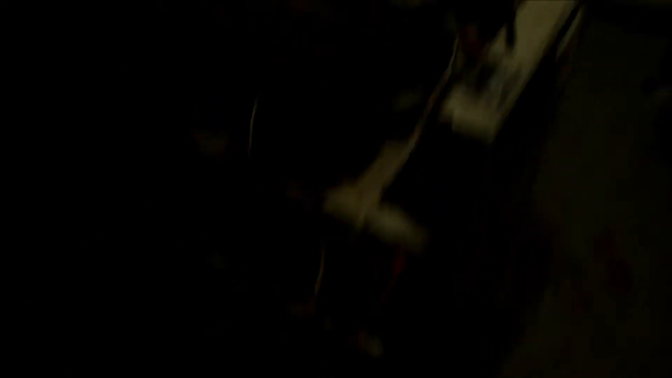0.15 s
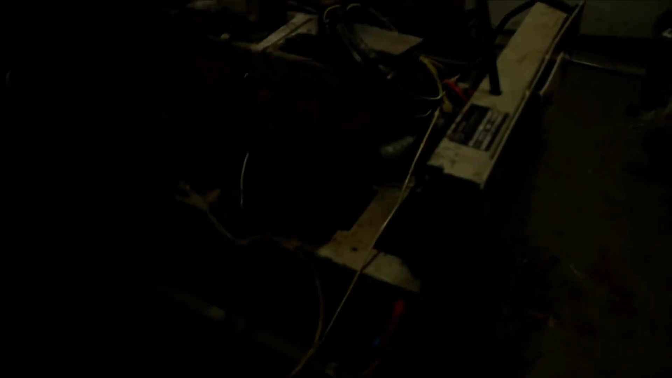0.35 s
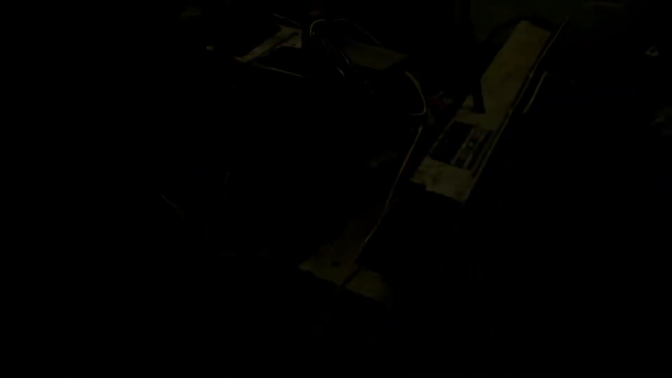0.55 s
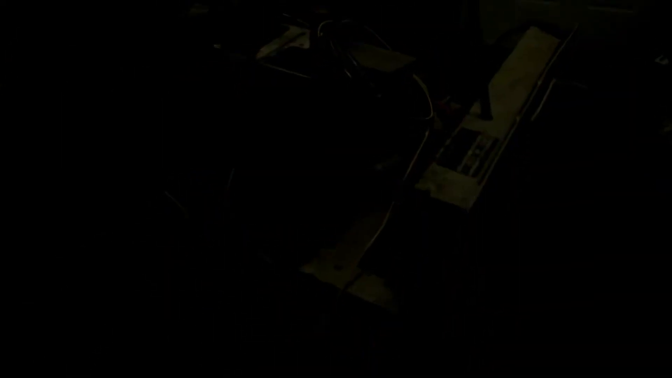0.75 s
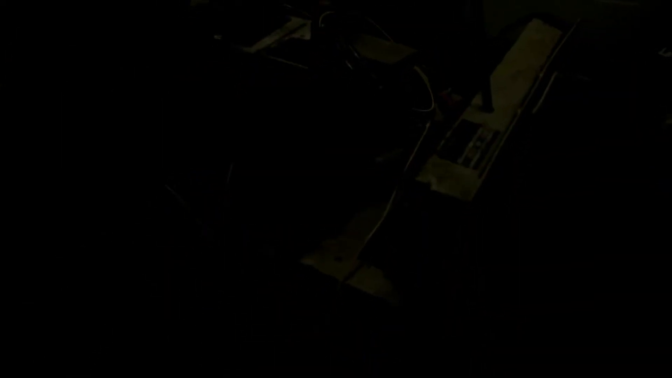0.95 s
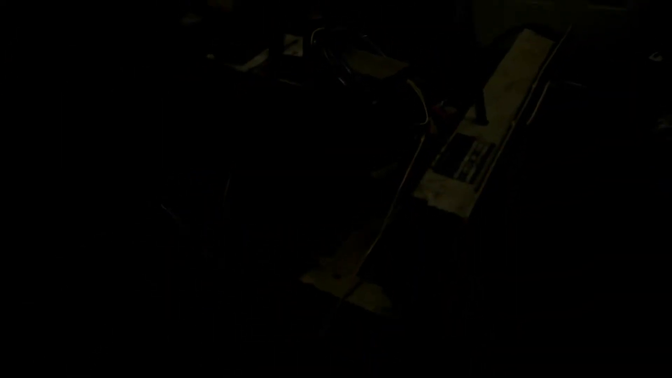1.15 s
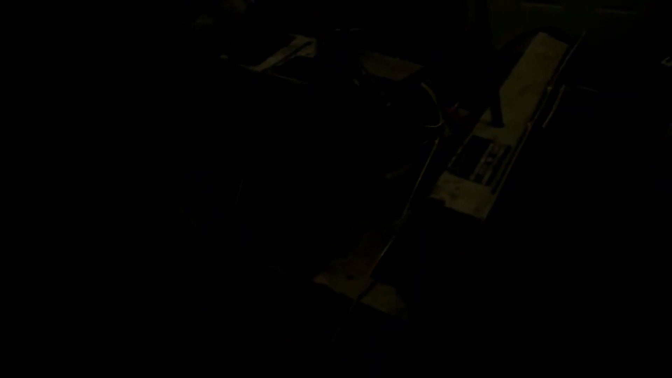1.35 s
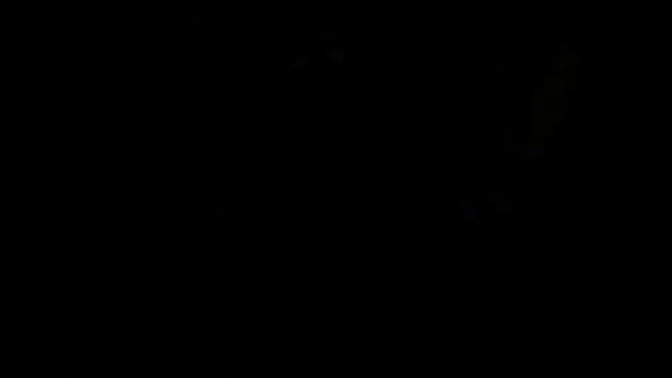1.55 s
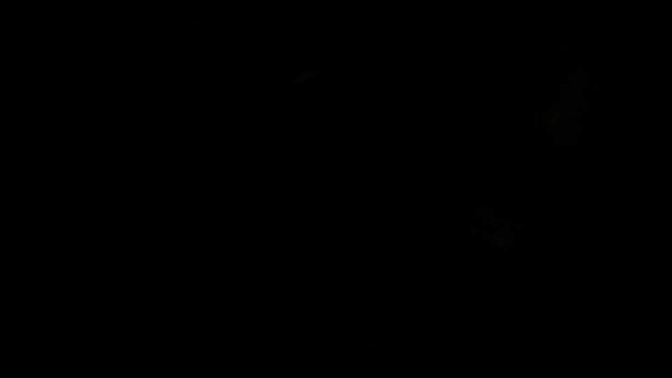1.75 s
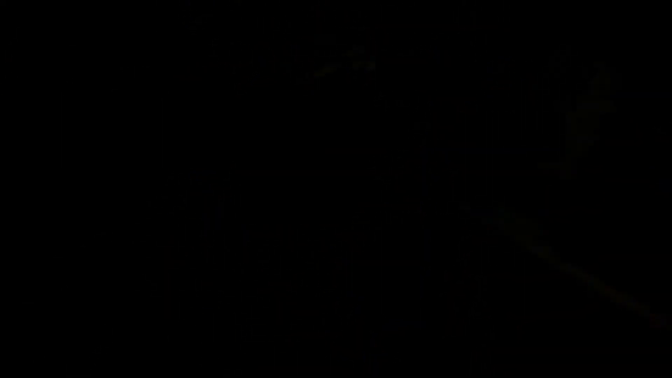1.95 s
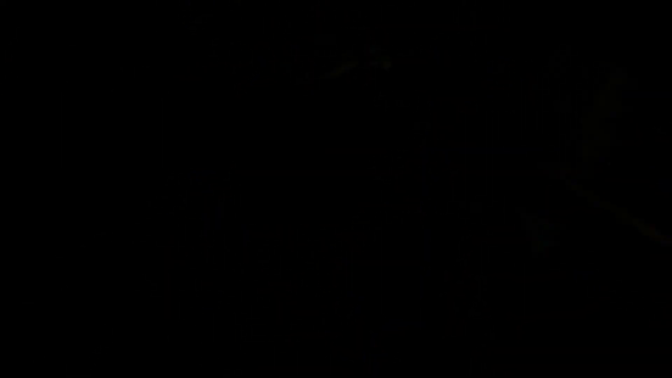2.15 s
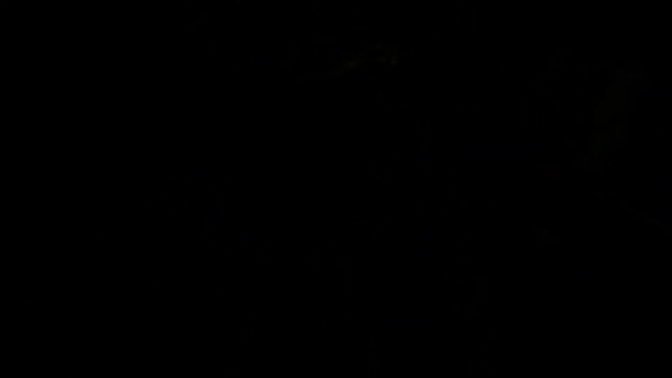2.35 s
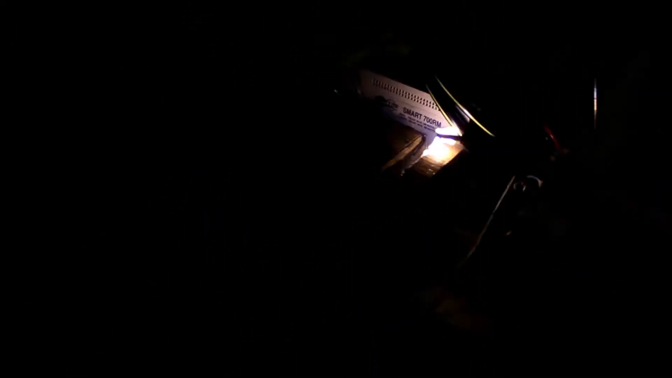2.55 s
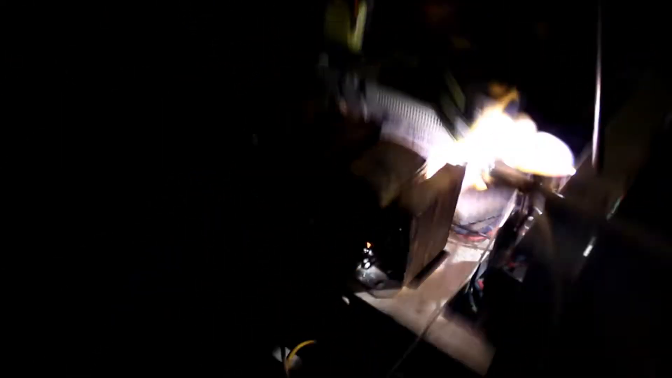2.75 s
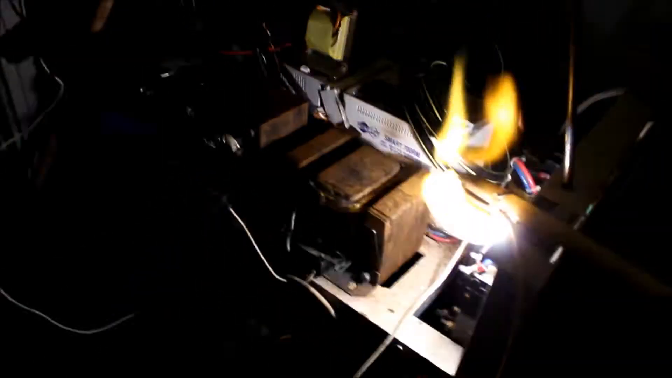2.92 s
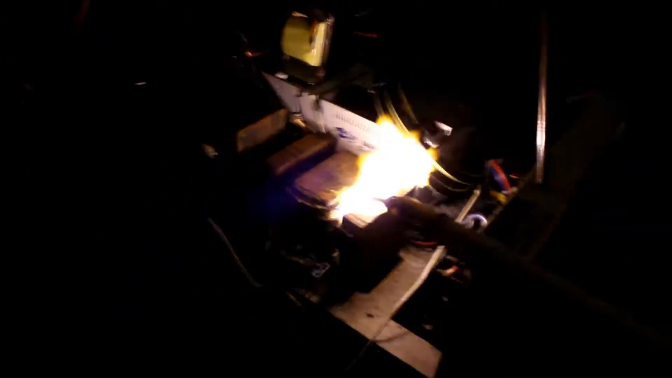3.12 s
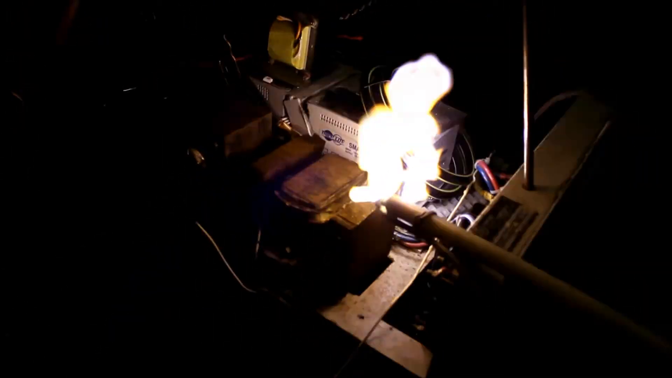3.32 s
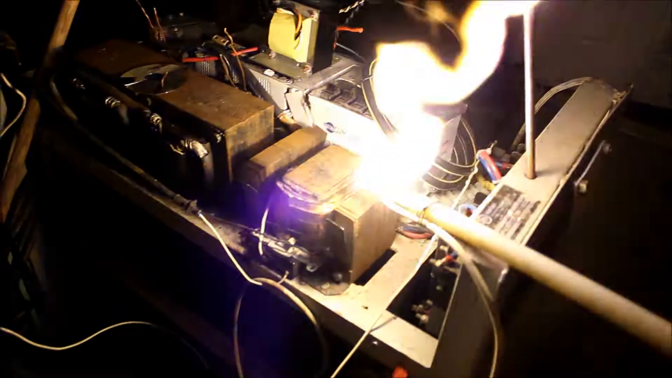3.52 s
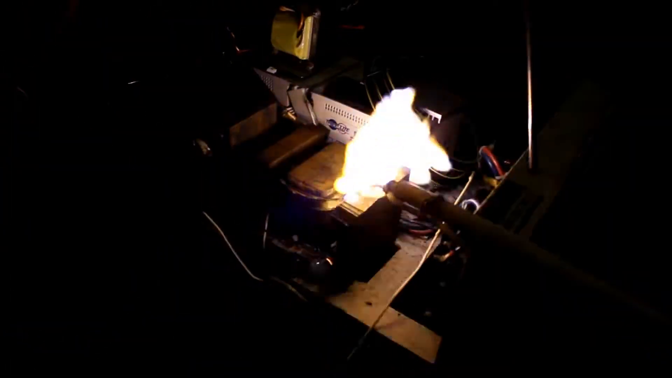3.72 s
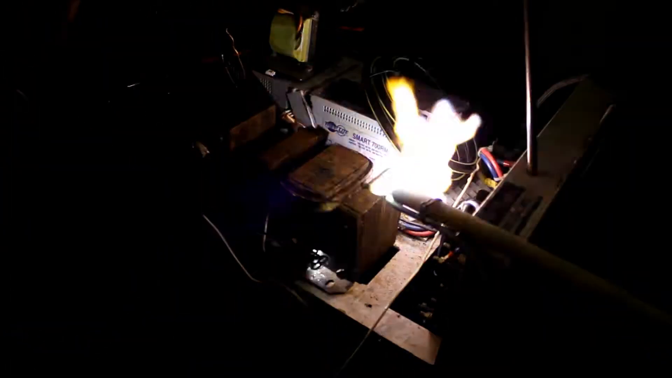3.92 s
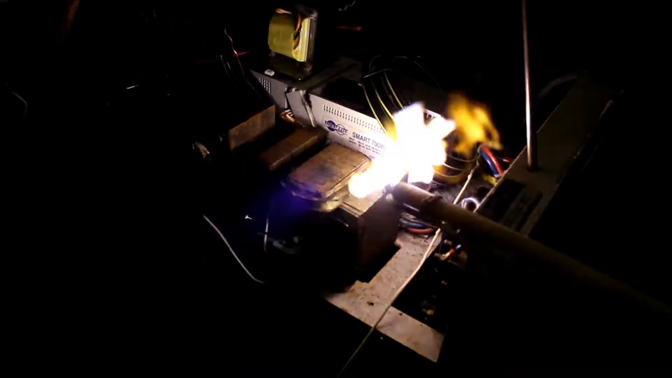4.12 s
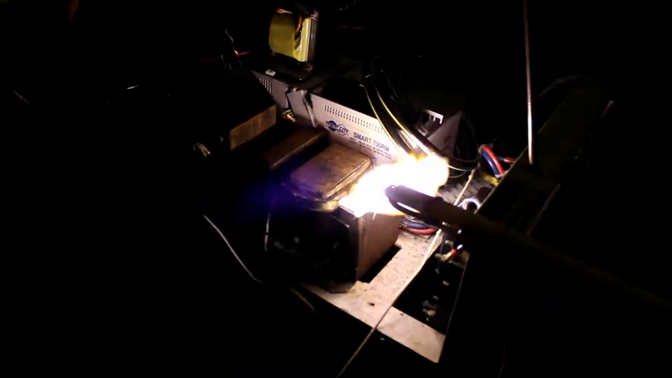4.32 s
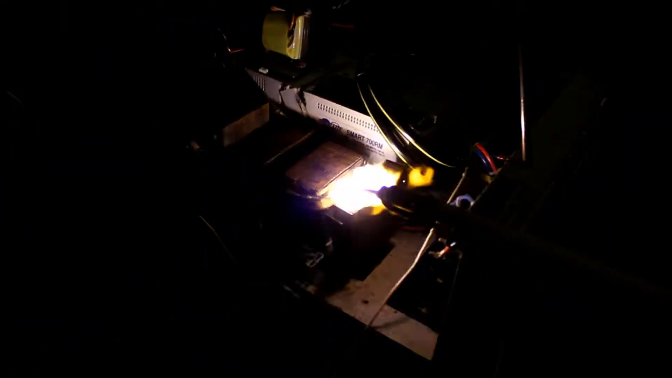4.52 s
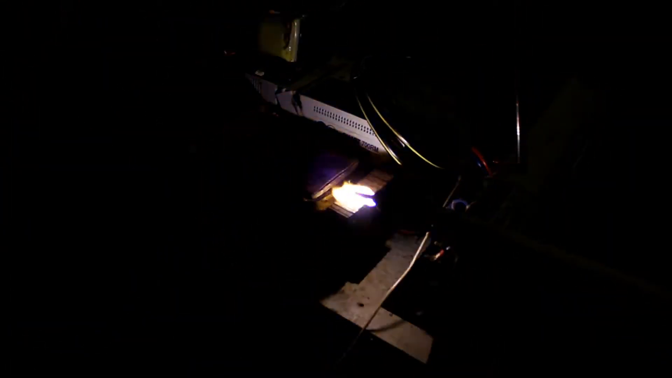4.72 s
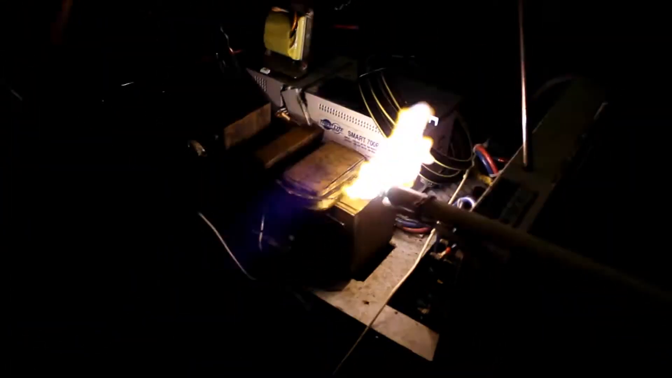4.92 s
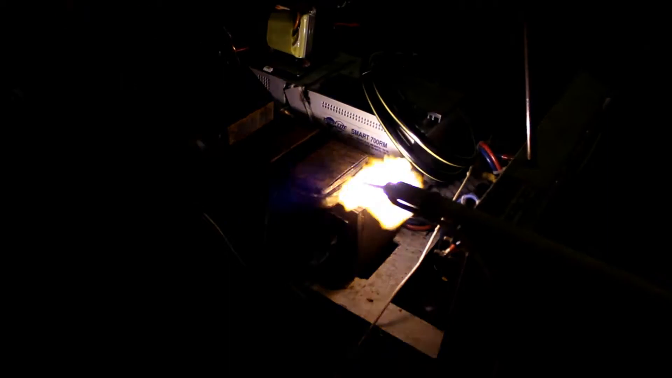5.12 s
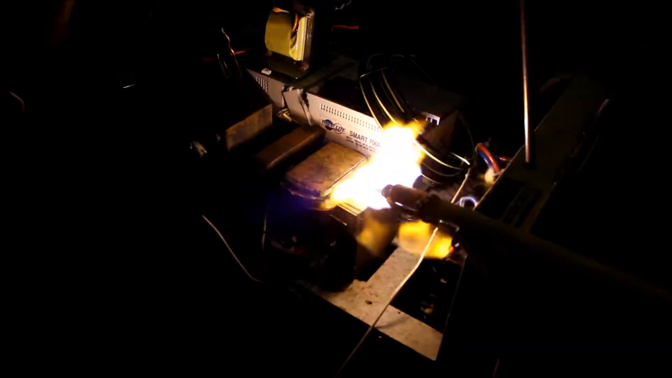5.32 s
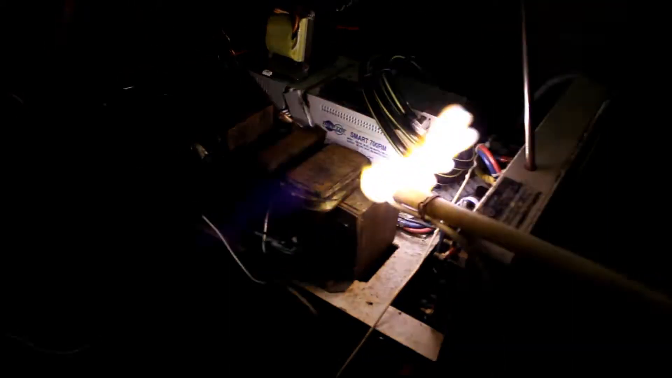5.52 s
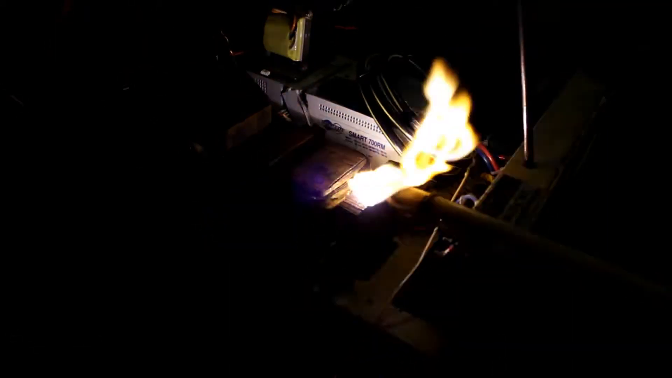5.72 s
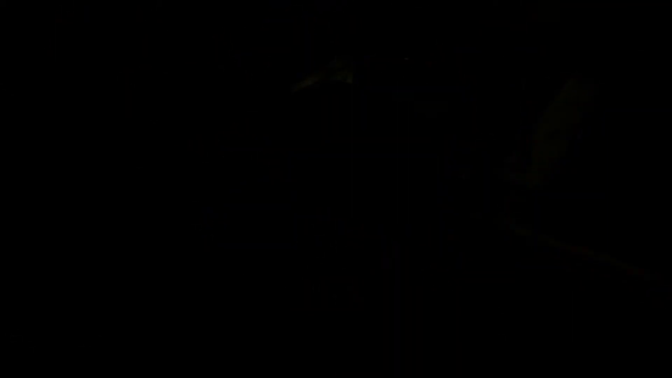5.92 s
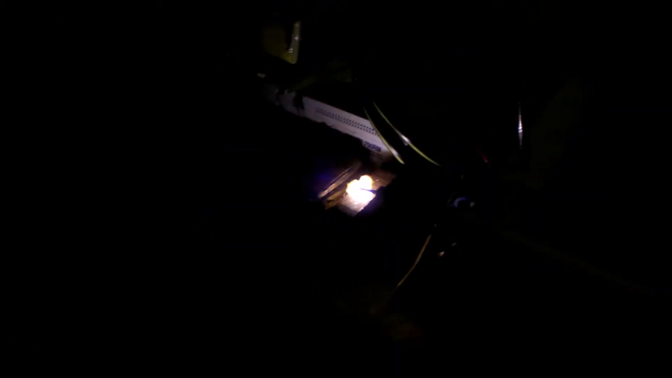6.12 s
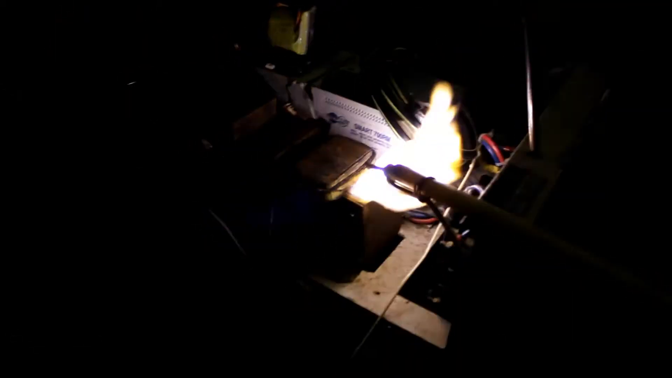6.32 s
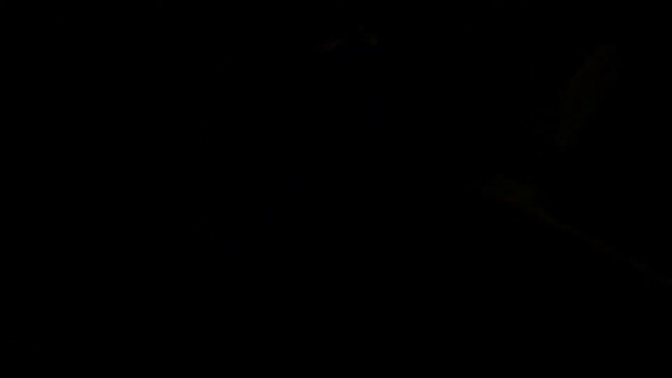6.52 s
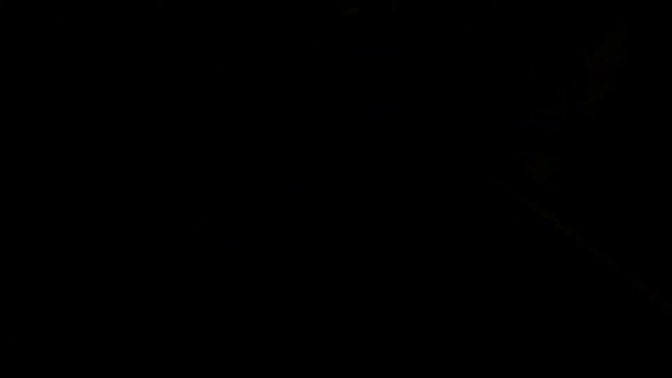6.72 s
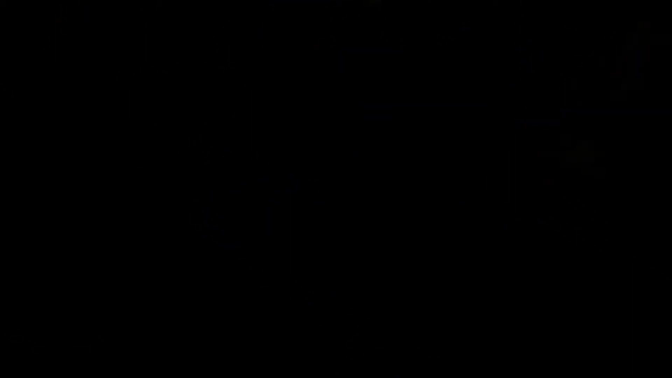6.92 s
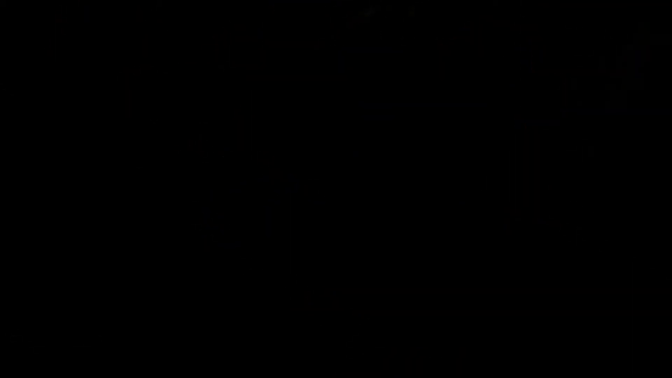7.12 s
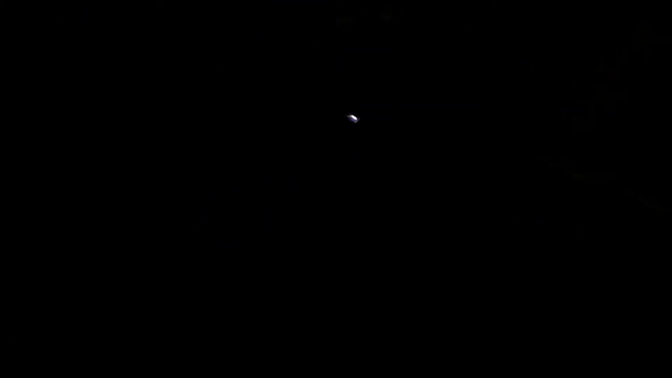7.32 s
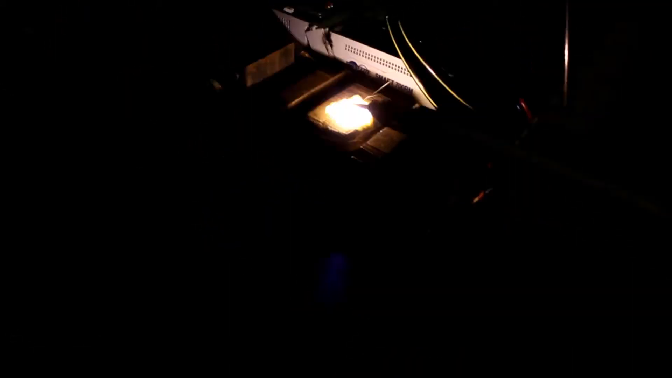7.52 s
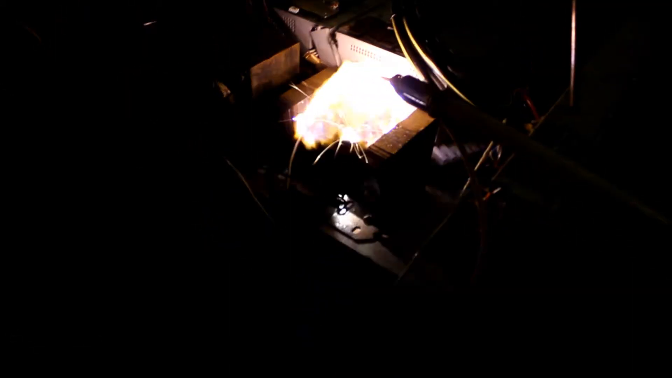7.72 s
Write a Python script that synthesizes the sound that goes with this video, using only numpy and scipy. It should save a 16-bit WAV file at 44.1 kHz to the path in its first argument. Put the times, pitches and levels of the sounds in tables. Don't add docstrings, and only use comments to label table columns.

```python
import sys
import numpy as np
from scipy import signal
from scipy.fft import rfft, irfft
from scipy.io import wavfile
from scipy.ndimage import uniform_filter1d

SR = 44100
rng = np.random.default_rng(int(sys.argv[2]) if len(sys.argv) > 2 else 0)


def wrap_up_sound(samples):
    columns = np.atleast_2d(samples).T
    tamed = np.clip(columns, -1, 1)
    steps = np.round(tamed * 32767).astype(np.int16)
    wavfile.write(sys.argv[1], SR, steps)


def attenuation_scalar(level_db):
    decades = np.asarray(level_db, float) / 20
    return 10 ** decades


N = 346626
TIME = np.arange(N) / SR
MAINS_HZ = 59.993
QUIET_DB = -38.5
CORONA_DB = -18

# f/Hz, density/dB
HISS = [(700, -14), (1200, -2.5), (1800, 0), (2600, 2), (4000, -0.5), (5000, -2.5), (7000, -15.5)]
SIZZLE = [(3500, -9.5), (5000, -1.5), (6500, 1.5), (9500, 1), (13000, -0.5), (16500, -3)]
ROAR = [(20, -15), (50, -14.5), (150, -1.5), (300, -0.5), (600, 2.5), (900, -1), (1300, -4), (2200, -8.5)]
# f/Hz, width/Hz, level/dB
CASES = [(1830, 26, -14), (2146, 25, -19), (2268, 25, -17), (2668, 40, -21), (3360, 50, -24),
         (3680, 50, -24), (4010, 80, -24)]


def arc():
    length, burns = stretch()
    short = 1 - length
    hiss_db = flares()
    flare = uniform_filter1d(np.maximum(hiss_db, QUIET_DB) + 15.5, size=600)
    half = TIME * 2 * MAINS_HZ
    chance = rng.standard_normal((int(half[-1]) + 2, 3)).T
    luck = chance[:, half.astype(int)]

    hiss = patchy(HISS, patchy_db=1.35, rate=45)
    hiss = hiss + sum(attenuation_scalar(db + 2.2 * walk(8)) * unit(band(hiss, hz, w)) for hz, w, db in CASES)
    hiss = hiss + 0.75 * short * band(hiss, 3870, 2140)
    sizzle_db = 12 * short + 0.14 * flare
    sizzle = attenuation_scalar(sizzle_db + 1.4 * luck[1]) * patchy(SIZZLE, patchy_db=2.5, rate=40)
    noise = current_gate(half, luck[2]) * attenuation_scalar(0.91 * luck[0]) * (hiss + sizzle)

    roar_db = np.where(burns, -20 - 13.5 * short + 0.45 * flare, -120)
    roar = attenuation_scalar(roar_db) * patchy(ROAR, patchy_db=3.0, rate=15)
    hum = arc_hum(chance, short, burns, flare) + loaded_cores(half, short, burns)
    return attenuation_scalar(hiss_db - 0.6) * noise + roar, hum


def current_gate(half, lateness):
    late = np.clip(half % 1 - .07 - 0.1 * lateness, 0, 1)
    current = (1 - np.exp(-late / .05)) * np.clip(1 - late ** 3 * 1.4, 0, 1)
    polarity = attenuation_scalar(1.0 * (-1) ** half.astype(int))
    depth = np.clip(.56 + 0.066 * walk(9.8), 0, 1)
    return (1 - depth + 1.23 * depth * current) * polarity ** depth


# f/Hz, level/dB
HUM = [(30, -22), (120, -5), (240, 1.5), (360, -1), (480, -9), (600, -3), (760, -14), (1200, -24),
       (2500, -42), (5000, -65)]


def arc_hum(chance, short, burns, flare):
    burn = uniform_filter1d(flare, size=SR // 4)
    surge = np.clip(flare - burn, -8, 8)
    hum_db = np.where(burns, -16.5 - 45.5 * short + 0.067 * burn - 0.85 * surge, -120)
    zeros = np.arange(chance.shape[1] - 2) + 0.647 + .007 * chance[2, 2:]
    at = (zeros * SR / (2 * MAINS_HZ)).astype(int)
    pulses = np.zeros(N)
    pulses[np.clip(at, 0, N - 1)] = -attenuation_scalar(0.84 * chance[1, 2:])
    cepstrum = irfft(np.log(attenuation_scalar(response(HUM))), N)
    cepstrum[1:N // 2] *= 2
    cepstrum[N // 2 + 1:] = 0
    return attenuation_scalar(hum_db) * unit(irfft(rfft(pulses) * np.exp(rfft(cepstrum)), N))


def loaded_cores(half, short, burns):
    load = uniform_filter1d(burns * attenuation_scalar(-30.5 - 18 * short), size=900)
    return load * np.sqrt(2) * np.cos(2 * np.pi * (half - .2))


# t/s, stretch (0 to 1)
BURNS = [
    [(2.541, 0.54), (2.6, 0.94), (2.75, 0.93), (2.88, 0.57), (3.0, 0.89), (3.15, 0.73), (3.45, 0.89),
     (3.62, 0.71)],
    [(3.626, 0.86), (4.0, 0.79), (4.3, 0.74), (4.37, 0.53), (4.56, 0.68), (4.64, 0.27), (4.8, 0.26)],
    [(4.801, 0.3), (4.91, 0.63), (5.2, 0.73), (5.42, 0.57), (5.52, 0.77), (5.69, 0.75), (5.77, 0)],
    [(6.101, 0.02), (6.19, 0.62), (6.43, 0.79), (6.49, 0.42)],
    [(7.492, 0.5), (7.58, 0.74), (7.72, 0.8), (7.86, 0.65)],
]


def stretch():
    s, length = np.transpose(sum(BURNS, []))
    burns = sum((TIME >= b[0][0]) & (TIME < b[-1][0] + .007) for b in BURNS) > 0
    return np.clip(np.interp(TIME, s, length), 0, 1), burns


# t/s, hold/s, hiss level/dB, snap peak/dB
FLARES_FIRST = [(2.5413, 0.048, -19, 1.5), (2.6095, 0.017, -22.5, 3), (2.64, 0.073, -15.5, -5.5),
                (2.741, 0.021, -18.5, 0), (2.9364, 0.0089, -13, 0), (2.966, 0.031, -14.5, -16),
                (3.013, .02, -16.5, -4), (3.041, .12, -12.5, 0), (3.195, 0.019, -13, -1.5),
                (3.248, .025, -14, 3), (3.292, 0.0365, -16, -19), (3.345, 0.012, -17.5, 1),
                (3.3927, 0.0143, -16, -3), (3.443, 0.005, -15.5, 1)]
FLARES_LONG = [(3.6247, 0.082, -11, 3), (3.72, 0.061, -12.5, -6), (3.8004, 0.045, -12.5, -1),
               (3.895, 0.02, -16, -6), (3.979, 0.024, -13, -6), (4.0611, 0.041, -15, -1.5),
               (4.138, 0.0147, -13.5, -3), (4.2083, 0.087, -14, -1.5), (4.31, 0.054, -15, -6),
               (4.36, .02, -18, -20), (4.4004, 0.026, -14.5, -6.5), (4.4594, 0.087, -15, 1),
               (4.594, 0.13, -20, 5), (4.6928, 0.057, -21, 1.5), (4.777, 0.0084, -22.5, 0.5),
               (4.8026, 0.085, -14.5, -10), (4.9257, .06, -15.5, 1), (5.0, 0.054, -15, -2),
               (5.076, 0.059, -15.5, -3), (5.1594, 0.01, -17, 1), (5.212, 0.0162, -18, -2),
               (5.2773, 0.13, -15, -1.5), (5.431, 0.044, -16.5, -7), (5.5422, 0.048, -17.5, -2.5),
               (5.6426, 0.011, -15, 0), (5.695, 0.0147, -18, 2.5)]
FLARES_LATE = [(6.101, 0.1, -17, -3), (6.129, .02, -15, -5), (6.235, 0.045, -13.5, -5.5),
               (6.3, 0.018, -14.5, -11), (6.343, 0.024, -17.5, 3), (6.3934, 0.029, -16, 0),
               (6.426, 0.012, -13, 5), (7.4935, 0.11, -15, 6), (7.569, 0.24, -10.5, 4),
               (7.709, 0.13, -12, -3)]


def flares():
    sag_db_per_s, fade_db_per_s = 16, 201
    out = np.where(stretch()[1], QUIET_DB, -120.)
    for s, hold, db, snap_db in FLARES_FIRST + FLARES_LONG + FLARES_LATE:
        i = slice(int(s * SR), int(s * SR) + SR // 2)
        t = TIME[:len(out[i])]
        swell_s = 0.0022 + 0.0011 * max(-snap_db, 0)
        swell_db = -11 * np.exp(-t / swell_s)
        fall_db = sag_db_per_s * t + fade_db_per_s * np.maximum(t - hold, 0)
        out[i] = np.maximum(out[i], db + swell_db - fall_db)
    return out


# t/s, peak/dB
SPARKS = [
    (2.5408, -3),
    (7.494, -3),
    (2.8174, 2),
    (2.8266, 1),
    (2.8494, 4),
    (2.8512, -3),
    (2.8634, 10.5),
    (2.9335, 10),
    (3.5995, -15),
    (6.0845, -19),
]


def snaps():
    bright = unit(colour(rng.standard_normal(N), SIZZLE))
    dull = unit(colour(rng.standard_normal(N), HISS))
    out = np.zeros(N)
    length = stretch()[0]
    for s, _, _, peak_db in FLARES_FIRST + FLARES_LONG + FLARES_LATE:
        dull_db = 3.5 - 25 * (1 - length[int(s * SR)])
        i = slice(int(s * SR), int(s * SR) + 2000)
        t = TIME[:len(out[i])]
        shape = (1 - np.exp(-t / 0.0005)) * np.exp(-t / 0.0033)
        out[i] += attenuation_scalar(peak_db - 4) * shape * (bright[i] + attenuation_scalar(dull_db) * dull[i])
    for s, peak_db in SPARKS:
        t = np.arange(40) / 3
        spike = t * (2 - t) * np.exp(-t)
        out[int(s * SR) + np.arange(40)] += attenuation_scalar(peak_db + 7) * spike
    return out


# t/s, streamers/dB, low hum minus level/dB, 6 kHz ring/dB, two-cycle pattern/dB
SPELLS = [
    (0, 0, -26, -14, -4),
    (.17, 0, -26.5, -2.5, -4),
    (2.55, 0, -17.5, -3, -8),
    (6.3, -1, -16.5, 3.5, -12),
]


def corona():
    s, *columns = np.transpose(SPELLS)
    level_db = heard_db()
    buzz_db, hum_db, ring_db, pair_db = (c[np.searchsorted(s[1:], TIME)] for c in columns)
    buzz = streamers(pair_db + 3.5 * walk(3.44))
    ring_gain = attenuation_scalar(ring_db - 11.0 + .7 * (level_db - CORONA_DB))
    out = attenuation_scalar(level_db) * (attenuation_scalar(buzz_db) * buzz + ring_gain * cavity_ring())
    return out + attenuation_scalar(level_db + hum_db + 41) * core_hum()


# f/Hz, density/dB
BUZZ = [(100, -80), (600, -48), (1000, -27), (1500, -9.5), (2000, -5.5), (2600, -8), (5300, -10),
        (6200, -2.5), (8600, -5), (10300, -2), (11500, -5.5), (13000, -2), (16000, -5.5)]
# f/Hz, share that repeats over one or two cycles
REPEATS = [(1000, .8), (2000, .75), (4000, .55), (6200, .6), (8500, .5), (12000, .3), (16000, .25)]
# phase/cycle, rise/cycle, fall/cycle, level over the echoes/dB
BURSTS = [
    (.002, .03, .08, 12.5),
    (.48, .012, .06, 8.5),
    (.72, .01, .03, 4),
    (.31, .01, .02, 4),
]


def streamers(pair_db):
    shape = np.sqrt(1 + sum(attenuation_scalar(2 * db) * burst(p, r, f) ** 2 for p, r, f, db in BURSTS))
    steady = looped(0.99, spread_db=0.5) + attenuation_scalar(pair_db) * looped(2, spread_db=-0.5)
    steady = steady / np.sqrt(1 + attenuation_scalar(2 * pair_db))
    fresh = grains(N, spread_db=4.0) * attenuation_scalar(1.3 * walk(110))
    sharp = response([(4500, 0), (7000, 1)])
    steady, fresh = (sharp * whiten(x * shape) + (1 - sharp) * whiten(x * shape ** 0.42)
                     for x in (steady, fresh))
    share = response(REPEATS)
    mixed = steady * np.sqrt(share) + fresh * np.sqrt(1 - share)
    return unit(irfft(mixed * attenuation_scalar(response(BUZZ)), N))


# f/Hz, width/Hz, level/dB
CAVITIES = [(1980, 170, -10.5), (2900, 130, -13), (3550, 170, -13.5), (6090, 520, 0), (7280, 280, -13),
            (7900, 320, -14), (9300, 500, -11), (10300, 520, -8), (13000, 700, -9)]


def cavity_ring():
    spark = looped(1, spread_db=1.5) * burst(.99, .004, .012) * attenuation_scalar(1.0 * walk(60))
    return unit(sum(attenuation_scalar(db) * unit(band(band(spark, hz, w), hz, w)) for hz, w, db in CAVITIES))


# harmonic of the mains, level/dB
CORE_EARLY = [(1, -15), (2, -11), (3, -16), (4, -5), (5, -14), (6, -5), (7, -19), (8, 0), (9, -17),
              (10, -6), (11, -12), (12, -11), (13, -18), (14, -8), (15, -10), (16, -5), (17, -11),
              (18, -11), (19, -10), (20, -3), (21, -10), (22, -3), (23, -2), (24, -1)]
CORE_LATE = [(1, -22), (2, -6), (3, -22), (4, -1), (5, -9), (6, -1), (7, -10), (8, -9), (9, -11), (10, 0),
             (11, -16), (12, -12), (13, -12), (14, -7), (15, -11), (16, -6), (17, -5), (18, -5), (19, -10),
             (20, -11), (21, -5), (22, -6)]
# f/Hz, density/dB
AIR = [(20, -38), (45, -17), (150, -8), (300, 8.5), (600, 4), (1000, 7.5), (1500, -22), (2200, -31)]


def core_hum():
    hum = attenuation_scalar(-48.5) * patchy(AIR, patchy_db=1.8, rate=9.9)
    for lines, on, top_db in ((CORE_EARLY, TIME < 4, -41.5), (CORE_LATE, TIME >= 4, -49)):
        for k, db in lines:
            tone = np.sin(2 * np.pi * (k * MAINS_HZ * TIME + rng.random()))
            hum += on * attenuation_scalar(top_db + db) * np.sqrt(2) * tone
    return hum


def heard_db():
    duck_db, recover_db_per_s = 8.5, 15
    last = np.maximum.accumulate(np.where(stretch()[1], TIME, -10))
    ducked_db = np.maximum(duck_db - recover_db_per_s * (TIME - last), 0)
    weak_db = -3 * np.clip((0.18 - TIME) / 0.058 + 1, 0, 1)
    return CORONA_DB - ducked_db + weak_db


# t/s, half length/s, level/dB
SCRAPES = [
    (2.385, 0.031, -25.5),
    (7.275, 0.06, -29),
]
# t/s, half length/s, f/Hz, level/dB
THUDS = [
    (.25, .1, 62.5, -52),
    (.55, .15, 56.5, -60),
    (1.15, .25, 68, -51),
    (1.85, .25, 76, -54),
    (7.1, .2, 60.3, -61),
    (7.59, .03, 28.4, -28),
    (6.107, .02, 45.6, -36),
]


def handling():
    grit = unit(band(grains(N, spread_db=1.5), 1700, 1800))
    out = sum(attenuation_scalar(db) * np.exp(-((TIME - s) / w) ** 2) * grit for s, w, db in SCRAPES)
    for s, w, hz, db in THUDS:
        swell = attenuation_scalar(db + 1.5 * walk(6.1)) * np.exp(-((TIME - s) / w) ** 2)
        out = out + swell * np.sin(2 * np.pi * hz * TIME)
    return out


def workshop(x, t60_s=0.22, wet_db=-9):
    t = TIME[:SR // 2]
    tail = rng.standard_normal(len(t)) * np.exp(-np.log(1000) * t / t60_s) * (t > .003)
    return x + attenuation_scalar(wet_db) * signal.fftconvolve(x, tail / np.sqrt(np.sum(tail ** 2)))[:N]


def unit(x):
    return x / np.sqrt(np.mean(x ** 2))


def response(points, size=N):
    hz, value = np.transpose(points)
    return np.interp(np.log(np.fft.rfftfreq(size, 1 / SR) + 1), np.log(hz), value)


def colour(x, points):
    return irfft(rfft(x) * attenuation_scalar(response(points)), N)


def whiten(x):
    spectrum = rfft(x)
    return spectrum / np.sqrt(uniform_filter1d(abs(spectrum) ** 2, size=N * 480 // SR))


def band(x, hz, width_hz):
    return signal.lfilter(*signal.iirpeak(hz, hz / width_hz, SR), x)


def walk(rate):
    k = int(SR / rate)
    held = np.repeat(rng.standard_normal(N // k + 1), k)
    return unit(uniform_filter1d(uniform_filter1d(held, k), k)[:N])


def grains(size, spread_db):
    sizes = np.minimum(rng.exponential(size=size), 3.4)
    return unit(rng.standard_normal(size) * attenuation_scalar(spread_db * sizes))


def patchy(points, patchy_db, rate):
    spectrum = rfft(rng.standard_normal(N)) * attenuation_scalar(response(points))
    octave = np.log2(np.fft.rfftfreq(N, 1 / SR) + 1)
    out = np.zeros(N)
    for centre in np.arange(np.log2(points[0][0]), np.log2(points[-1][0]) + .5, .5):
        part = irfft(spectrum * np.clip(1 - 2 * abs(octave - centre), 0, 1), N)
        out += part * attenuation_scalar(patchy_db * walk(rate))
    return unit(out)


def looped(cycles, spread_db):
    size = int(cycles * SR / MAINS_HZ)
    fine = signal.resample(grains(size, spread_db), 8 * size)
    return np.interp(TIME * MAINS_HZ / cycles % 1, np.arange(len(fine)) / len(fine), fine)


def burst(phase, rise, fall):
    late = (TIME * MAINS_HZ - phase + .5) % 1 - .5
    return np.exp(np.where(late < 0, late / rise, -late / fall))


def scene():
    noise, hum = arc()
    return (corona() + hum + workshop(noise + snaps()) + handling())[None]


def roll_off(x):
    return signal.sosfilt(signal.butter(12, 17020, fs=SR, output="sos"), x)


def record(dry):
    top = .7
    limited = dry / (1 + abs(dry / top) ** 12) ** (1 / 12)
    cut = irfft(rfft(limited) * (np.fft.rfftfreq(N, 1 / SR) < 15830), N)
    return roll_off(cut)


dry = scene()
out = record(dry)
wrap_up_sound(out)
```